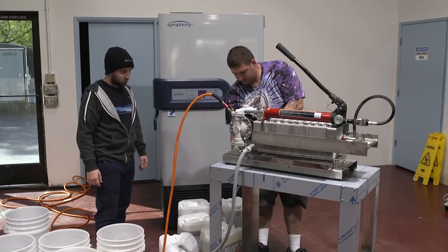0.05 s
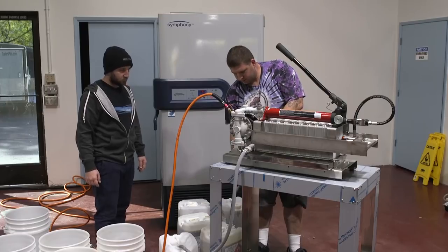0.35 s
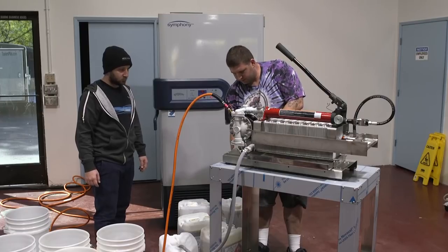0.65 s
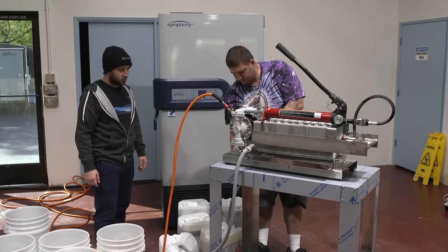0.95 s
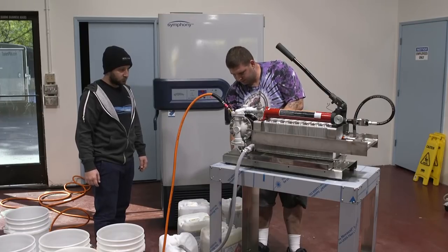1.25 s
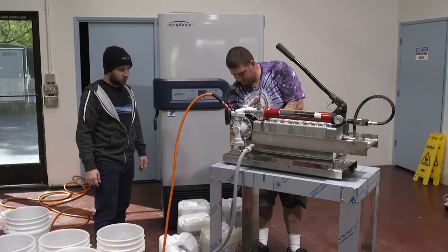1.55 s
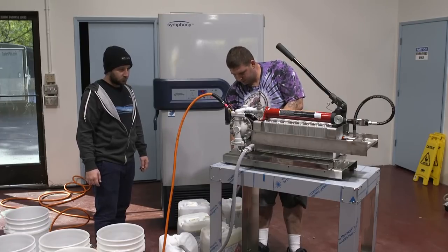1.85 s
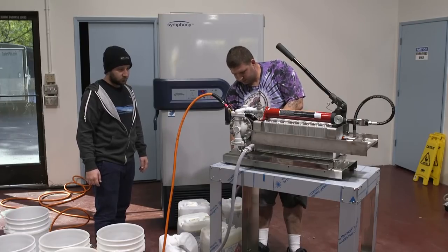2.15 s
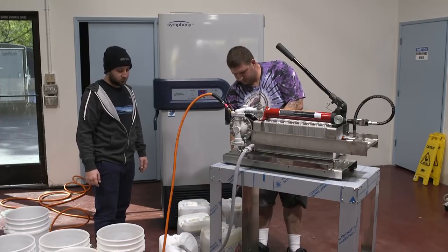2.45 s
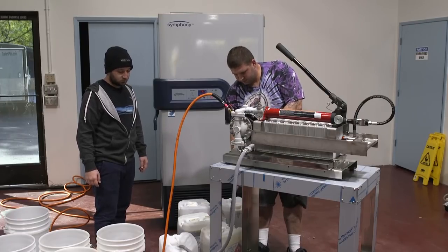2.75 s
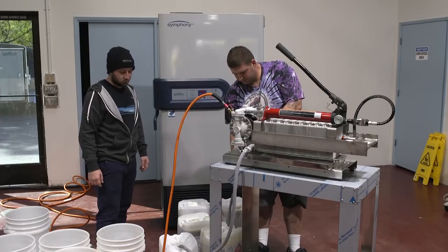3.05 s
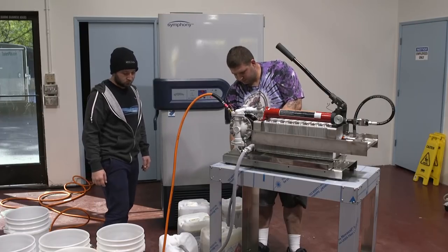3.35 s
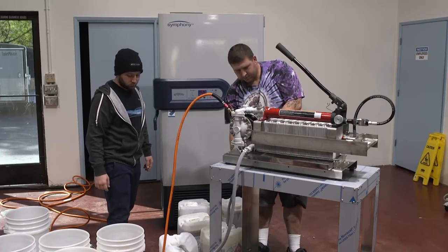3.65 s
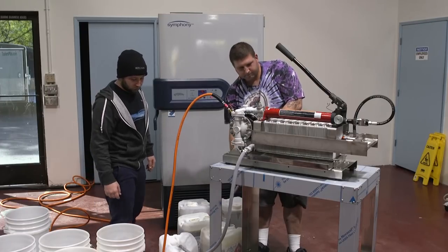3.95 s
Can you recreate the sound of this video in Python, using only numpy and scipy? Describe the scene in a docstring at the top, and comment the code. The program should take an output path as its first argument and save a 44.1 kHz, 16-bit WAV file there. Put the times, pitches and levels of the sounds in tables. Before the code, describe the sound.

A pneumatic pump chugs fast, each stroke a thump and a hissing burst of air.

```python
"""In a hard-walled workshop, an air-driven diaphragm pump beats about six times a second.
Its two chambers are slightly out of step. On each stroke a valve shifts with a low pop, and air
hisses out of the exhaust port with a thump, a hollow bark, a rough sputter and a short hoot.
The room rings on between strokes, over a steady leak of air."""
import sys
import numpy as np
from scipy import signal
from scipy.fft import rfft, irfft, next_fast_len
from scipy.io import wavfile
from scipy.ndimage import map_coordinates

SR = 44100
rng = np.random.default_rng(int(sys.argv[2]) if len(sys.argv) > 2 else 0)


def wrap_up_sound(samples):
    """Save the sound to the file named by the first command line argument, as 16-bit audio."""
    columns = np.atleast_2d(samples).T
    # keep every value between -1 and 1, then stretch to whole-number steps
    tamed = np.clip(columns, -1, 1)
    steps = np.round(tamed * 32767).astype(np.int16)
    wavfile.write(sys.argv[1], SR, steps)


N = 176400
TIME = np.arange(N) / SR

# one row per pump stroke: start t/s, hiss level/dB, sputter level/dB, length of full flow t/s,
# bark level/dB, hoot level/dB
STROKES = [(0.0059, -0.1, -4, 0.01, -1, 0.5), (0.171, -1.0, 0, 0.0062, -1.5, -9),
           (0.3282, 0.5, -0.2, 0.0079, -0.5, -3), (0.4935, -0.1, 4, 0.0074, -5, -4),
           (0.6502, -0.2, 3, 0.0046, 1.3, -2), (0.8156, -0.7, -0.1, 0.0085, -3, -13),
           (0.9707, 1, 4, 0.0033, 3, -14), (1.1329, -0.9, 0, 0.023, 1.3, 2),
           (1.2883, 0.1, 0.3, 0.0072, 1.5, -0.5), (1.4499, -0.5, 0.5, 0.02, 1, 2.5),
           (1.608, 0.2, 5.7, 0.002, 3.5, 2), (1.7696, -0.6, 0.1, 0.016, -0.5, -6),
           (1.9276, 1.2, 1.8, 0.0068, 2.1, -0.5), (2.0912, 0, 1.8, 0.013, -2, 3.5),
           (2.2461, 0.1, 3.8, 0.0049, -1.5, -2.9), (2.4126, -0.2, -1, 0.0063, 0, -10),
           (2.5679, 1, 4.7, 0.0027, -2.5, 0.5), (2.7331, 0, -0.5, 0.0088, -2.5, -2),
           (2.8884, 1.1, 1.5, 0.005, 1, -0.5), (3.053, -0.4, -2, 0.0075, -0.5, -1),
           (3.2077, 0.5, -0.5, 0.0067, -2, 1.5), (3.3733, 0, 1.5, 0.007, -2, -12),
           (3.5286, 1.2, 1.5, 0.0082, 1, -3), (3.6934, -0.0, -1, 0.012, 0, 2.5),
           (3.8489, 1, 6, 0.0042, 0.5, -1)]
# the tone colour of each rush of air, from bass to treble: f/Hz, level/dB
LEAK_COLOUR = [(25, -3), (60, -17), (150, 1.5), (520, -12.5), (1000, -2), (1450, -11), (1950, -20.5),
               (3600, -9.5), (4750, -14), (7700, -14.5), (10000, -14.5), (15500, -33)]
JET_COLOUR = [(30, -19), (300, -29), (700, 5), (1100, -5), (2100, -10.5), (3500, -3), (5000, -8.5),
              (6500, -2.5), (9200, -6.5), (12000, -3.5), (15000, -5), (15900, -17)]
FIZZ_COLOUR = [(30, -60), (9000, -30), (12000, -10.5), (13200, 6), (14000, -6), (14800, -9), (15800, -14)]
BARK_COLOUR = [(30, 16), (150, -9), (300, -2), (550, 0), (800, 10), (950, 4), (1100, -13.5), (1600, 7.5),
               (2500, -28)]
SPUTTER_COLOUR = [(100, 1), (900, -28.5), (1700, -0.5), (2100, -9), (3100, 10.5), (3700, 5), (4500, -8),
                  (6000, -7.5), (15000, -19.5)]
# pitches where the exhaust port rings, and the dips between them: centre f/Hz, width f/Hz, level/dB
PORT_PEAKS = [(551, 48, 14), (726, 39, 4.5), (866, 120, -0.5), (1304, 139, 9), (2590, 130, 3.5),
              (3666, 168, 7), (4175, 180, 6), (5860, 290, 5), (6450, 194, 2), (7680, 260, 12.5),
              (8495, 96, 10.5), (10110, 156, 5.5), (13900, 500, 4.5), (14900, 220, 4.5)]
PORT_DIPS = [(320, 15, -3), (476, 6.7, -16), (6820, 89, -5), (7470, 100, -11), (3310, 56, -3.5),
             (8400, 140, -3.5), (10600, 80, 0.5), (12100, 120, -2), (14200, 150, -9), (15600, 100, -5)]
# the tone colour of the pop's echo: f/Hz, level/dB
POP_ECHO_COLOUR = [(30, -8), (120, -16.5), (230, -8.5), (310, -11), (500, -3), (750, 2), (1200, 1),
                   (3000, -5)]
# how long the room rings at each pitch: f/Hz, t/s to fade by 60 dB
ROOM_RING = [(60, .6), (250, 0.59), (600, 0.38), (1500, 0.46), (4000, 0.23), (8000, 0.13), (15000, 0.25)]


def amp(db):
    """Turn decibels into a number to multiply by."""
    return 10 ** (np.asarray(db) / 20)


def unit(x):
    """Scale a signal so that its average power is 1."""
    return x / np.sqrt(np.mean(x ** 2) + 1e-20)


def look_up(table, hz):
    """Read between a table's rows, giving each octave equal space."""
    freqs, values = np.transpose(table)
    return np.interp(np.log(hz + 1), np.log(freqs + 1), values)


def filtered(x, gain_at):
    """Turn each frequency in x up or down by gain_at(hz)."""
    size = next_fast_len(len(x) + SR // 2)
    return irfft(rfft(x, size) * gain_at(np.fft.rfftfreq(size, 1 / SR)), size)[:len(x)]


def wobble(rate_hz):
    """A smooth curve through rate_hz random values a second."""
    return map_coordinates(rng.standard_normal(N // 10), [TIME * rate_hz])


def port_noise(colour):
    """Swirling air makes noise, coloured by the ringing of the exhaust port."""
    def gain_at(hz):
        bumps = [*PORT_PEAKS, *PORT_DIPS]
        port_db = sum(db * np.exp(-.5 * ((hz - centre) / width) ** 2) for centre, width, db in bumps)
        return amp(look_up(colour, hz) + port_db)
    return unit(filtered(rng.standard_normal(N), gain_at))


def puff(start, rise_s, hold_s, fade_s):
    """The loudness of one release of air: it rises, holds, then fades."""
    age = np.maximum(TIME - start, 0)
    return (1 - np.exp(-age / rise_s)) * np.exp(-np.maximum(age - hold_s, 0) / fade_s)


def leak():
    """Air escapes steadily, blending with the background of the room."""
    return amp(-36.5) * unit(filtered(rng.standard_normal(N), lambda hz: amp(look_up(LEAK_COLOUR, hz))))


def pops(width_s=0.00051, rebound=0.79, spread_db=0.63):
    """The valve shifts: one pulse of pressure with a rebound on either side."""
    sound = np.zeros(N)
    for start, *_ in STROKES:
        offset = (TIME - start) / width_s
        strength = amp(-2 + spread_db * rng.standard_normal())
        sound -= strength * (1 - rebound * offset ** 2) * np.exp(-offset ** 2 / 2)
    return sound


def jet():
    """A bright hiss of air starts with the pop and fades as the chamber empties."""
    flow = sum(amp(db) * puff(start, rise_s=0.0002, hold_s=0.015, fade_s=0.038)
               for start, db, *_ in STROKES)
    return amp(-16.5) * flow * port_noise(JET_COLOUR)


def fizz(peak_s=0.044, width_s=0.037):
    """As the pressure drops, the jet thins to a fine fizz that dies before the next stroke."""
    flow = sum(amp(db) * (TIME > start) * np.exp(-.5 * ((TIME - start - peak_s) / width_s) ** 2)
               for start, db, *_ in STROKES)
    return amp(-32.5) * flow * port_noise(FIZZ_COLOUR)


def thumps(delay_s=0.0022, width_s=0.0023):
    """The released air gives one low shove of pressure after each pop."""
    return amp(-16) * sum(np.exp(-.5 * ((TIME - start - delay_s) / width_s) ** 2)
                          for start, *_ in STROKES)


def bark(delay_s=0.0045, rise_s=0.009):
    """The rush of air makes the pump's hollow spaces ring with a low bark."""
    flow = sum(amp(db) * puff(start + delay_s, rise_s, hold_s=rise_s + length, fade_s=0.022)
               for start, _, _, length, db, _ in STROKES)
    return amp(-20) * flow * port_noise(BARK_COLOUR)


def sputter(delay_s=0.0089, flutter_db=2.5):
    """At full flow the jet breaks into a short, fluttering rasp."""
    flow = sum(amp(db) * puff(start + delay_s, rise_s=0.0026, hold_s=length, fade_s=0.0072)
               for start, _, db, length, *_ in STROKES)
    flutter = amp(flutter_db * wobble(rate_hz=711.7))
    return amp(-16) * flow * unit(flutter * port_noise(SPUTTER_COLOUR))


def hoot(delay_s=0.01, pitch_hz=932, wander_radians=0.74):
    """The jet blows a short, unsteady note on the exhaust opening, louder on some strokes."""
    flow = sum(amp(db) * puff(start + delay_s, rise_s=0.0019, hold_s=0.018, fade_s=0.0093)
               for start, *_, db in STROKES)
    phase = 2 * np.pi * pitch_hz * TIME + wander_radians * wobble(rate_hz=110.7)
    return amp(-22.5) * flow * unit(np.sin(phase))


def metal_echoes(hiss, echo_db=-9, fade_s=0.0042):
    """Nearby metal adds many quick echoes that colour the hiss."""
    t = np.arange(SR // 20) / SR
    bounces = rng.standard_normal(len(t)) * np.exp(-t / fade_s)
    echoes = signal.fftconvolve(hiss, bounces / np.linalg.norm(bounces))[:N]
    return (hiss + amp(echo_db) * echoes) / np.hypot(1, amp(echo_db))  # stays about as loud


def room_tail(delay_s=0.0014, build_s=0.0096):
    """The workshop's answer to one click: a wash of echoes whose treble dies first."""
    hz, t, noise = signal.stft(rng.standard_normal(SR // 2), SR, nperseg=256)
    ring_s = look_up(ROOM_RING, hz)[:, None]
    tail = signal.istft(noise * amp(-60 * t / ring_s) / np.sqrt(ring_s), SR, nperseg=256)[1]
    age = np.maximum(np.arange(len(tail)) / SR - delay_s, 0)
    tail *= 1 - np.exp(-age / build_s)
    return tail / np.linalg.norm(tail)


def room_echoes(sound, fresh_share=0.58):
    """Each stroke rings the room a little differently."""
    shared_tail = room_tail()
    echoes = np.zeros(N + SR)
    cuts = [0] + [int(start * SR) - SR // 100 for start, *_ in STROKES[1:]] + [N]  # between strokes
    for begin, end in zip(cuts, cuts[1:]):
        tail = np.sqrt(1 - fresh_share) * shared_tail + np.sqrt(fresh_share) * room_tail()
        echo = signal.fftconvolve(sound[begin:end], tail)
        echoes[begin:begin + len(echo)] += echo
    return echoes[:N]


def scene():
    """The pump's sounds and their echoes add up over the steady leak."""
    pop = pops()
    hiss = metal_echoes(jet() + fizz())
    air = [(hiss, -10), (sputter(), -8), (bark(), -6), (hoot(), -12)]  # sound, level/dB sent to the room
    direct = pop + thumps() + sum(sound for sound, _ in air)
    pop_to_room = amp(1.5) * filtered(pop, lambda hz: amp(look_up(POP_ECHO_COLOUR, hz)))
    air_to_room = sum(amp(db) * sound for sound, db in air)
    return (direct + room_echoes(pop_to_room + air_to_room) + leak())[None]


def record(dry, low_hz=24.3, ceiling_db=-0.5, top_hz=15800):
    """The microphone's bass cut rings after each pop; peaks are rounded and the top treble is cut."""
    bass_cut = signal.butter(4, low_hz, "high", fs=SR, output="sos")
    sound = signal.sosfilt(bass_cut, dry[0])
    rounded = sound / (1 + np.abs(sound / amp(ceiling_db)) ** 6) ** (1 / 6)
    return filtered(rounded, lambda hz: hz < top_hz)[None]


dry = scene()
out = record(dry)
wrap_up_sound(out)
```